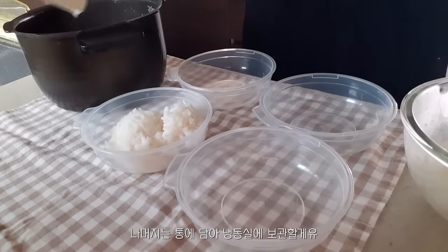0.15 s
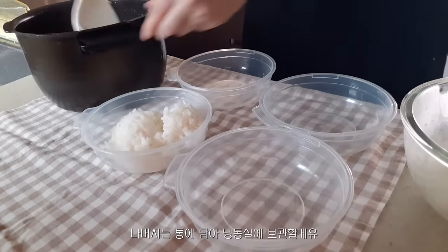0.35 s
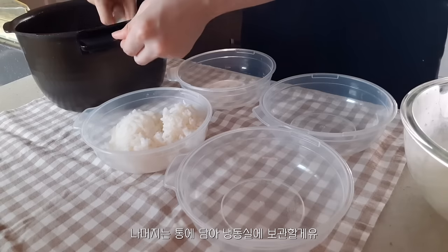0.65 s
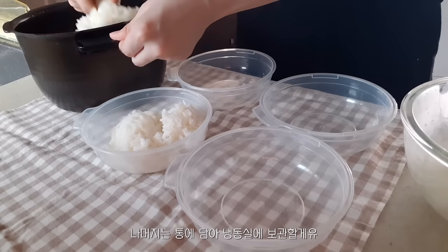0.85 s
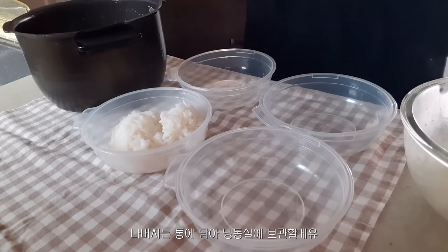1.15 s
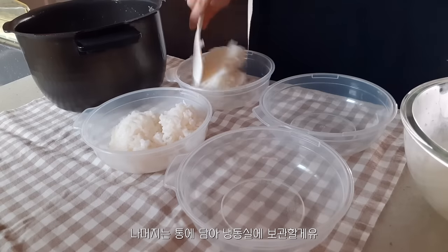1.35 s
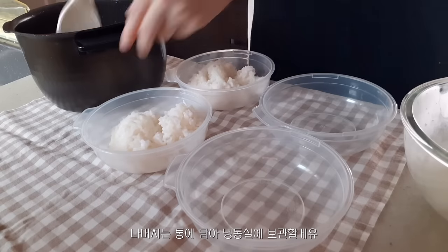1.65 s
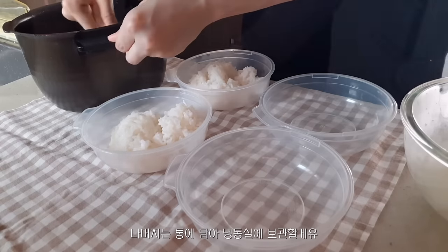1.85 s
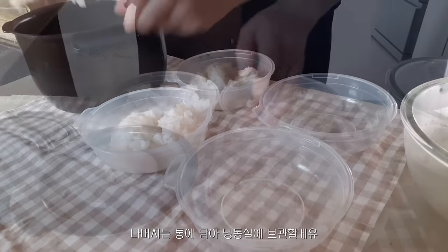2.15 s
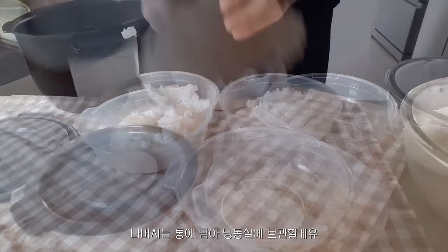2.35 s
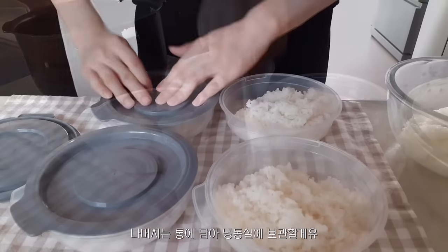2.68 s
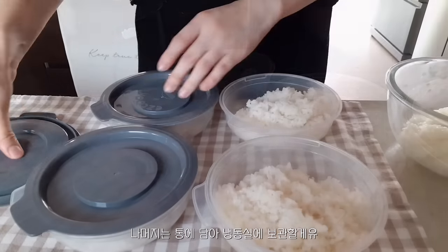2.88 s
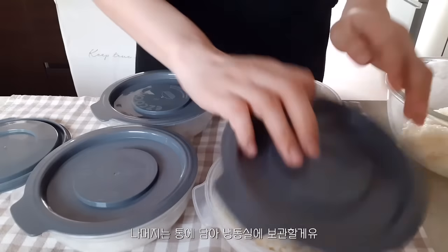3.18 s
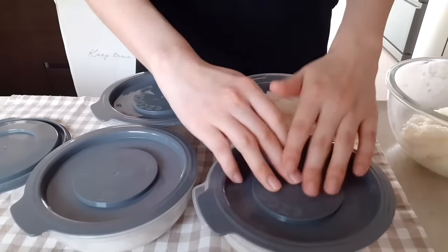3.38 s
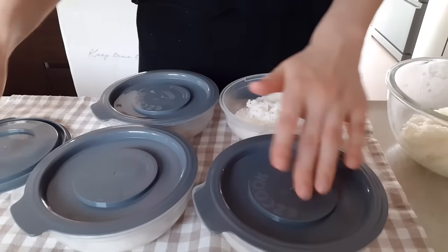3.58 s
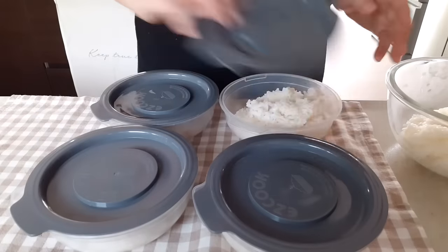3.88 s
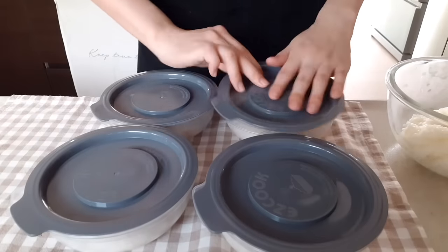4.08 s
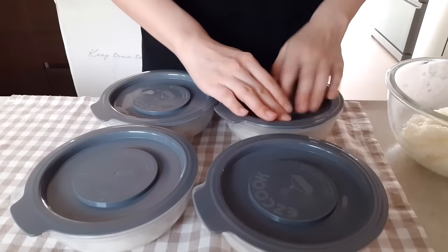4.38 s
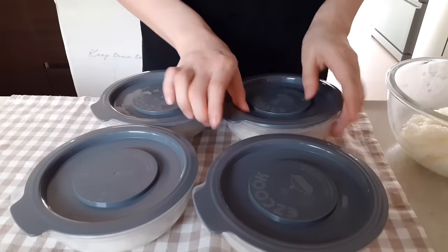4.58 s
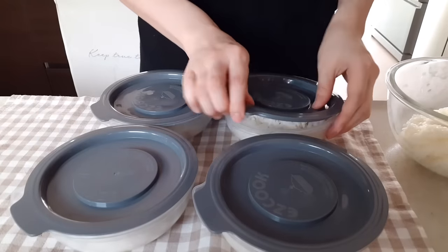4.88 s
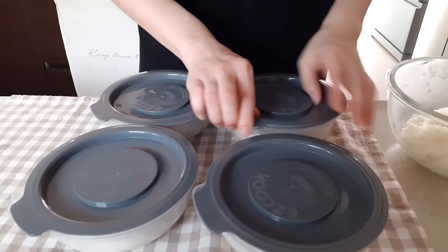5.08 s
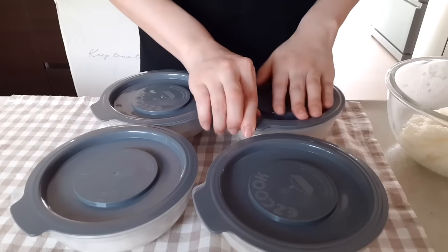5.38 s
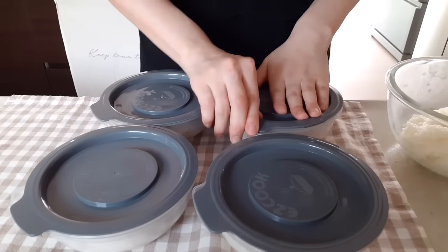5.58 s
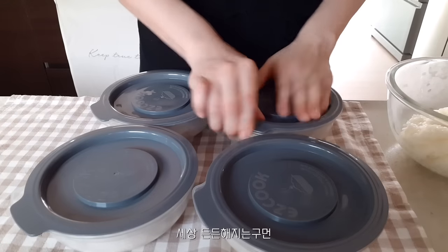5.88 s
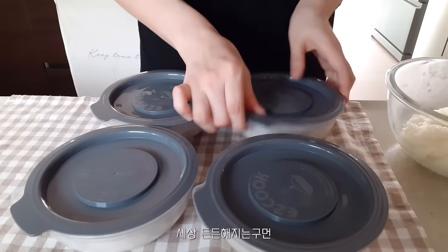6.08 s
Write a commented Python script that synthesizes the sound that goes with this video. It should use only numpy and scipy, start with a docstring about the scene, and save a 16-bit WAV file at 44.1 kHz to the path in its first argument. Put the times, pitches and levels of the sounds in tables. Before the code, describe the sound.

Plastic food tubs are closed at close range in a quiet kitchen, with a short echo, faint low room noise and a slight high hiss early on. Near 0.9 seconds a paddle lightly grazes a pot, followed by a soft thud of rice. Another muffled pat and a quick cluster of hollow knocks come around 1.8 seconds. From 2 to 2.9 seconds lids and rims click, scrape and clatter, with a sharp clack at 2.6. Between 3 and 3.5 seconds lids snap on with loud hollow pops. Tiny squeaks, scrapes and a run of lighter knocks follow until about 4.2 seconds. Then palms softly rub and pat a lid, with dull thumps around 5 seconds and a heavier push at 5.6. One more snap sounds near 5.9 seconds, and faint ticks and a soft pat close at about 6.1.

```python
"""Packing rice into plastic tubs

Rice is scooped from a pot into thin tubs on a cloth-covered kitchen table; lids are laid on and
pressed shut. Each knock is a short contact that rings tub, lid and room: more weight gives more thud
and less ring. Rims scrape and squeak, lid panels pop, palms rub and press, over faint hiss and air."""
import sys
import numpy as np
from scipy import signal
from scipy.fft import rfft, irfft, next_fast_len
from scipy.io import wavfile
from scipy.ndimage import uniform_filter1d

SR = 44100
rng = np.random.default_rng(int(sys.argv[2]) if len(sys.argv) > 2 else 0)


def output_pcm(signal):
    """Save a mono or channel-first signal as 16-bit PCM at the path in sys.argv[1].

    Samples are clipped to [-1, 1] before scaling.
    """
    pcm = np.clip(np.atleast_2d(signal).T, -1, 1) * 32767
    wavfile.write(sys.argv[1], SR, np.round(pcm).astype(np.int16))


N = 274743
RING_SAMPLES = 11025


def amp(db):
    return 10 ** (np.asarray(db) / 20)


def unit_rms(x):
    return x / np.sqrt(np.mean(x ** 2) + 1e-20)


def unit_energy(x):
    return x / np.sqrt(np.sum(x ** 2) / len(x))


def over_time(points):
    return np.interp(np.arange(N) / SR, *np.transpose(points))


def over_log_hz(points, hz):
    f, value = np.transpose(points)
    return np.interp(np.log(hz + 1), np.log(f + 1), value)


def resonance(f, hz, q):
    return 1 / (1 + (q * ((f + 1) / hz - hz / (f + 1))) ** 2)


def add(mix, start_s, sound):
    part = mix[:, max(round(start_s * SR), 0):][:, :sound.shape[-1]]
    part += sound[..., :part.shape[1]]


def pulse(gain, size=2048):
    """Minimum-phase pulse with spectrum gain(f)."""
    log_gain = np.log(gain(abs(np.fft.fftfreq(size, 1 / SR))) + 1e-5)
    return np.fft.ifft(np.exp(np.conj(signal.hilbert(log_gain)))).real


# Hard knocks and snaps on a rim: (time [s], strength [dB], hand weight [dB], ring [Hz])
RIM_KNOCKS = [(1.8095, -1, -2.5, 3080), (1.8146, 4, 5.5, 1350), (1.8187, -0.5, 9.5, 3150),
              (2.052, -8.5, -3.5, 3770), (2.077, -9.5, -2, 3700), (2.4435, 2, -9, 2800),
              (2.513, -5, -12.5, 2640), (2.527, 0.5, -3.5, 3660), (2.6091, 12.5, -2, 1670),
              (3.011, -0.5, -1, 1260), (3.2175, 3.5, -1, 1940), (3.3365, 5, 0, 2080), (3.341, -4, -9, 2430),
              (3.348, -1, -2.5, 2260), (3.461, 10, 7.5, 1790), (3.969, -2.5, 6.5, 3940),
              (4.028, -6.5, -16, 2410), (4.051, -5, 5, 2400), (4.083, -13, -11, 2520),
              (4.129, -7, -7.5, 2550), (4.19, -9, -6, 2240), (4.194, -4, 5, 2096), (5.863, -3, 1, 2190)]
HARD = dict(clack_db=-2, crack_db=-9, ping_db=5.5, low_hz=74, high_hz=21993)
# Blows muffled by rice or a palm: (time [s], strength [dB], hand weight [dB], ring [Hz])
MUFFLED_PATS = [(0.95, -14.5, 10.5, 500), (1.732, -6, 4, 537), (3.625, -3, 1.5, 730),
                (4.9875, 2, -4.5, 1155), (5.05, -9, -1.5, 1130), (5.167, -10.5, -8.5, 1030),
                (5.388, -9.5, -6, 1280), (5.494, -3.5, 0.5, 1040), (5.611, 2, -1.5, 720),
                (6.142, -8, 1, 1550)]
SOFT = dict(clack_db=-19, crack_db=-25, ping_db=-27, low_hz=102, high_hz=4512)


def knocks(rows, touch, choke=0.34):
    """Short, chattering contacts; a heavy hand stays on the lid and chokes what follows."""
    out = np.zeros((2, N))
    for time_s, strength_db, weight_db, ring_hz in rows:
        offset_s, chatter = contact()
        force = signal.fftconvolve(chatter, blow(strength_db, weight_db, ring_hz, **touch))
        add(out, time_s + offset_s, radiate(force, scatter_db=-choke * max(weight_db, 0)))
    return out


def contact(scrape_db=-15, scrape_s=0.0007, settle_db=-7, settle_s=0.003):
    """A rim scrapes in, snaps home at t = 0 and chatters as it settles."""
    t = np.arange(-256, 2048) / SR
    scrape = slips(len(t), per_s=8300) * np.exp(-abs(t) / scrape_s) * (t < 0)
    settle = slips(len(t), per_s=1500) * np.exp(-abs(t) / settle_s) * (t > 0)
    chatter = amp(scrape_db) * unit_rms(scrape) + amp(settle_db) * unit_rms(settle)
    return t[0], (t == 0) + chatter / np.sqrt(len(t))


def blow(strength_db, weight_db, ring_hz, clack_db, crack_db, ping_db, low_hz, high_hz):
    """One blow drives tub, wall, rim and lid; weight feeds the thud and damps the ring."""
    stiffness_db = 7.5 * np.log2(ring_hz / 2500)  # a stiffer spot rings higher, cracks harder
    ring_q = 0.73 * 2 ** (-weight_db / 13)
    parts = [(weight_db, 270, 0.31),  # hollow tub: thud
             (clack_db, 1400, 0.2),  # wall
             (crack_db + stiffness_db, 7500, 0.47),  # rim
             (-weight_db, ring_hz, ring_q)]  # lid

    def spectrum(f):
        power = sum((amp(db) * resonance(f, hz, q) ** 2) ** 2 for db, hz, q in parts)
        lid_mode = resonance(f, ring_hz, q=20) * resonance(f, ring_hz, q=0.2)
        power += amp(ping_db - weight_db / 2) ** 2 * lid_mode
        rolloff = 1 + (f / high_hz) ** 6 + (low_hz / (f + 1)) ** 4
        return np.sqrt(power / rolloff)

    return amp(strength_db) * pulse(spectrum)


# Modes of tub and lid: (frequency [Hz], gain [dB])
TUB_MODES = [(250, 1), (400, -8), (680, 2), (862, 5), (1192, -0.5), (1440, -3.5), (1570, -1.5), (1760, -5),
             (2040, -2.5), (2250, -8), (2490, -10), (3700, 3.5), (4850, 4)]


def tub(impulse_db=-4, t60_at_1khz_s=0.1):
    """Direct impulse plus modes; soft plastic dies fast, higher modes faster."""
    t = np.arange(RING_SAMPLES) / SR
    out = amp(impulse_db) * (t == 0)
    for hz, db in TUB_MODES:
        decay = amp(-60 * t / t60_at_1khz_s * np.sqrt(hz / 1000))
        gripped_hz = hz * (1 + 0.01 * rng.standard_normal())
        out += 2 * amp(db) * decay / decay.sum() * np.cos(2 * np.pi * gripped_hz * t)
    return out


def radiate(force, scatter_db=0, delay_at_1khz_s=0.00044):
    """Force to stereo sound via tub and echoes; bending waves carry treble faster than bass."""
    size = next_fast_len(len(force) + RING_SAMPLES)
    f = np.fft.rfftfreq(size, 1 / SR)
    bend_turns = 2 * delay_at_1khz_s * np.sqrt(f * 1000)
    right_lag_s = rng.normal(50e-6, 20e-6)
    delay = np.exp(-2j * np.pi * np.array([bend_turns, bend_turns + right_lag_s * f]))
    response = tub() + amp(scatter_db) * echoes()
    return irfft(rfft(force, size) * rfft(response, size) * delay, size)


# Lid panel pops: (time [s], level [dB], pitch [Hz])
LID_POPS = [(3.011, 4, 1213), (3.2175, 11, 2040), (3.3365, 18, 2120), (3.341, 11.5, 2250)]


def lid_pops(panel_q=8):
    """The flat panel pops through as the rim seats: a hollow clack."""
    out = np.zeros((2, N))
    for time_s, db, hz in LID_POPS:
        add(out, time_s, radiate(amp(db) * pulse(lambda f: resonance(f, hz, panel_q))))
    return out


# Light rim contacts: (time [s], strength [dB], ring [Hz])
RIM_TICKS = [(2.039, -18, 3720), (2.093, -20, 3900), (2.141, -17.5, 3950), (2.147, -8, 3220),
             (2.285, -9.5, 1200), (2.401, -18.5, 4040), (2.489, -7, 2720), (2.587, -12.5, 2820),
             (2.809, 0.5, 2240), (2.841, -6, 2000), (2.865, -18.5, 5960), (2.873, -4, 5070),
             (3.122, -6, 1850), (3.142, -9.5, 2000), (3.785, -6, 2000), (3.894, 0.5, 4230),
             (6.003, -24, 5000), (6.127, -19, 4300)]
LIGHT = dict(clack_db=-1, crack_db=-4.5, ping_db=2, low_hz=1048.5, high_hz=21987)


def rim_ticks(weight_db=-4):
    """Rim flicks past rim: one clean contact with little weight."""
    out = np.zeros((2, N))
    for time_s, strength_db, ring_hz in RIM_TICKS:
        force = blow(strength_db + weight_db, weight_db, ring_hz, **LIGHT)
        add(out, time_s, radiate(force, scatter_db=-2))
    return out


# Palms push a tub down: (time [s], level [dB])
PALM_PRESSES = [(4.193, -4), (4.988, -2.5), (5.611, 14), (5.862, 3.5)]


def palm_presses(table_hz=135, table_q=0.34):
    """The table answers a push with a soft, low thump."""
    out = np.zeros((2, N))
    thump = pulse(lambda f: resonance(f, table_hz, table_q) ** 2)
    for time_s, db in PALM_PRESSES:
        add(out, time_s, radiate(amp(db) * thump, scatter_db=3))
    return out


# Rim sliding over rim: (start [s], end [s], level [dB], centre [Hz])
RIM_SCRAPES = [(1.728, 1.737, -54.5, 3460), (2.251, 2.302, -51.5, 3800), (2.46, 2.514, -54, 3400),
               (2.807, 2.863, -46, 2220), (3.228, 3.33, -52, 2120), (3.39, 3.445, -57, 1600),
               (3.716, 3.79, -58.5, 5060), (3.775, 3.798, -40.5, 4400), (3.837, 3.88, -58, 7000),
               (3.974, 4.22, -58.5, 3100), (5.484, 5.516, -57.5, 4000), (5.606, 5.617, -50, 4500),
               (5.884, 6.099, -67.5, 2200), (6.132, 6.185, -58.5, 2050)]


def rim_scrapes(q=0.61):
    """A rim catches and lets go, each jerk ringing the plastic around one pitch."""
    out = np.zeros((2, N))
    for start_s, end_s, db, hz in RIM_SCRAPES:
        body = pulse(lambda f: np.sqrt(resonance(f, hz, 2 * q) * resonance(f, hz, q / 2)))
        add(out, start_s, stroke(end_s - start_s, db, body, slips_per_s=800, crackle_db=5.5))
    return out


def stroke(length_s, db, body, slips_per_s=1500, crackle_db=3.5):
    """Friction swells and fades, driving a body's impulse response."""
    size = max(round(length_s * SR), 64)
    friction = slips(size, slips_per_s, crackle_db) * signal.windows.tukey(size, 0.5)
    force = signal.fftconvolve(friction, body)
    return radiate(amp(db) * force * np.sqrt(size / (np.sum(force ** 2) + 1e-20)))


def slips(size, per_s, spread_db=4):
    """Sparse, tiny jerks of uneven size and either sign."""
    heights = amp(spread_db * np.minimum(rng.exponential(1, size), 4))
    return (rng.random(size) < per_s / SR) * heights * rng.choice([-1, 1], size)


# Palm over a lid, and first a rim dragging dully just before it snaps home at 3.461 s: (start [s], end [s],
# level [dB])
PALM_RUBS = [(3.443, 3.464, -48), (3.587, 3.64, -51), (4.31, 4.429, -64.5), (4.695, 4.775, -62),
             (4.987, 5.147, -59), (5.247, 5.272, -58.5), (5.399, 5.5, -61.5), (5.477, 5.506, -44),
             (5.618, 5.679, -58.5), (5.999, 6.006, -48)]
# Skin on plastic: (centre [Hz], Q, gain [dB])
SKIN_BANDS = [(1200, 0.73, 3), (4300, 0.84, -16)]


def palm_rubs():
    """Sliding skin, or a dragging rim, crackles through broad resonances: dull, with a soft hiss."""
    out = np.zeros((2, N))
    body = pulse(lambda f: sum(amp(db) * resonance(f, hz, q) ** 2 for hz, q, db in SKIN_BANDS))
    for start_s, end_s, db in PALM_RUBS:
        add(out, start_s, stroke(end_s - start_s, db, body))
    return out


# Plastic squeaks: (start [s], end [s], first pitch [Hz], last pitch [Hz], level [dB])
PLASTIC_SQUEAKS = [(2.979, 2.992, 13900, 15800, -37.5), (2.996, 2.999, 13300, 14300, -24.5),
                   (3.747, 3.771, 10240, 15200, -33.5), (3.972, 3.995, 835, 945, -38.5),
                   (4.008, 4.025, 884, 970, -44.5), (5.86, 5.868, 14350, 12500, -38)]


def squeaks(waver=0.061, roughness=0.87):
    """Fast stick-slip gives a short, unsteady gliding tone."""
    out = np.zeros((2, N))
    for start_s, end_s, first_hz, last_hz, db in PLASTIC_SQUEAKS:
        size = max(round((end_s - start_s) * SR), 64)
        drift, grip = unit_rms(uniform_filter1d(rng.standard_normal((2, size)), size=24, axis=1))
        pitch_hz = np.linspace(first_hz, last_hz, size) * (1 + waver * drift)
        envelope = np.exp(roughness * grip) * signal.windows.tukey(size, 0.3)
        tone = np.sin(2 * np.pi * np.cumsum(pitch_hz) / SR) * envelope
        tone = signal.lfilter(*signal.butter(2, first_hz / 2, "highpass", fs=SR), tone)
        add(out, start_s, radiate(amp(db) * unit_rms(tone), scatter_db=-3))
    return out


def pot_graze(start_s=0.877, end_s=0.897, db=-57, scrape_db=28, ring_db=10, ring_hz=3400, t60_s=0.025):
    """The paddle scrapes the pot and faintly rings it."""
    out = np.zeros((2, N))
    t = np.arange(RING_SAMPLES) / SR
    ring = amp(ring_db - 60 * t / t60_s) * np.sin(2 * np.pi * ring_hz * t)
    add(out, start_s, stroke(end_s - start_s, db, ring + amp(scrape_db) * (t == 0)))
    return out


def thin_ringing(start_s=1.47, end_s=1.676, db=-74, tones_hz=(3655, 4258, 8516, 9100)):
    """Faint, high tones swell and fade together."""
    out = np.zeros((2, N))
    t = np.arange(0, end_s - start_s, 1 / SR)
    tones = sum(np.sin(2 * np.pi * hz * t) for hz in tones_hz)
    add(out, start_s, amp(db) * tones * np.hanning(len(t)))
    return out


def echoes(flutter_db=-5, flutter_t60_s=0.023, room_db=-5.5, dull_db=-20, dull_hz=6000):
    """Flutter among the tubs, the kitchen's tail and a shorter, duller tail."""
    t = np.arange(RING_SAMPLES) / SR
    flutter = unit_energy(diffuse_noise(RING_SAMPLES) * amp(-60 * t / flutter_t60_s))
    dull = signal.lfilter(*signal.butter(2, dull_hz, fs=SR), kitchen(t60_scale=0.28))
    room = kitchen(t60_scale=0.69)
    return amp(flutter_db) * flutter + amp(room_db) * room + amp(dull_db) * dull


# Kitchen decay: (frequency [Hz], unscaled T60 [s])
KITCHEN_DECAY = [(200, 0.34), (1000, 0.26), (3500, 0.26), (15000, 0.18)]


def kitchen(t60_scale, build_s=0.00022):
    """Wall echoes build up, then each band dies at its own rate."""
    hz, frame_s, bands = signal.stft(diffuse_noise(RING_SAMPLES), SR, nperseg=256)
    t60_s = t60_scale * over_log_hz(KITCHEN_DECAY, hz)[:, None]
    tail = signal.istft(bands * amp(-60 * frame_s / t60_s), SR)[1][:, :RING_SAMPLES]
    onset = 1 - np.exp(-(np.arange(RING_SAMPLES) / SR / build_s) ** 2)
    return unit_energy(tail * onset)


# Left-right likeness of scattered sound: (frequency [Hz], coherence [0-1])
COHERENCE = [(200, 0.93), (600, 0.83), (1500, 0.1), (4000, 0)]


def diffuse_noise(size):
    """Stereo white noise, alike in the bass and apart in the treble."""
    mid, side = rfft(rng.standard_normal((2, size)))
    coherence = over_log_hz(COHERENCE, np.fft.rfftfreq(size, 1 / SR))
    mid *= np.sqrt((1 + coherence) / 2)
    side *= np.sqrt((1 - coherence) / 2)
    return irfft(np.array([mid + side, mid - side]), size)


def drifting_noise(spectrum, flicker_db=2):
    """Coloured noise whose level drifts in patches of time and frequency."""
    hz, _, bands = signal.stft(diffuse_noise(N), SR, nperseg=2048)
    patches = uniform_filter1d(rng.standard_normal(bands.shape[1:]), size=10, axis=0)
    patches = unit_rms(uniform_filter1d(patches, size=6, axis=1))
    gain = amp(over_log_hz(spectrum, hz)[:, None] + flicker_db * patches)
    return unit_rms(signal.istft(bands * gain, SR)[1][:, :N])


# Hiss colour: (frequency [Hz], relative density [dB])
HISS_SPECTRUM = [(1500, -26.5), (4200, -6), (5500, -4), (6200, 5), (7000, -13), (15000, -27)]
# Hiss envelope: (time [s], level [dB])
HISS_ENVELOPE = [(1.35, -74), (1.8, -77.5), (2.7, -82)]
MIDDLE_START_S, MIDDLE_END_S = 0.63, 4.29


def hiss(flutter_db=2.2):
    """A soft, high hiss flutters while the rice is scooped, then recedes."""
    t = np.arange(N) / SR
    flutter = unit_rms(uniform_filter1d(rng.standard_normal(N), size=1500))
    gate = (t > MIDDLE_START_S) * (t < MIDDLE_END_S)
    return drifting_noise(HISS_SPECTRUM) * amp(over_time(HISS_ENVELOPE) + flutter_db * flutter) * gate


# Room noise colours: (frequency [Hz], relative density [dB])
EARLY_AIR = [(25, -4), (105, -3), (300, -18.5), (520, -33), (1300, -32), (1550, -23.5), (1900, -34),
             (4200, -37.5), (9000, -54.5), (13000, -47)]
MIDDLE_AIR = [(40, -46.5), (130, -18.5), (210, -5), (290, -10), (400, -3.5), (480, -15), (700, -11),
              (900, -21), (1220, -18), (1700, -31.5), (8000, -38), (15000, -40)]
LATE_AIR = [(25, -15.5), (110, -1.5), (220, -12), (450, -20.5), (1000, -18.5), (2000, -28), (3200, -34),
            (6000, -38.5), (9000, -50.5), (13000, -35.5)]
# Room noise envelope: (time [s], level [dB])
AIR_ENVELOPE = [(.63, -56), (.75, -60.5), (2.8, -54.5), (3.15, -62), (4.3, -60), (4.65, -63), (6.2, -57)]


def room_air():
    """Faint, low room noise; its colour switches abruptly twice."""
    t = np.arange(N) / SR
    early, middle, late = map(drifting_noise, (EARLY_AIR, MIDDLE_AIR, LATE_AIR))
    air = np.select([t < MIDDLE_START_S, t < MIDDLE_END_S], [early, middle], late)
    return air * amp(over_time(AIR_ENVELOPE))


# Foreground pan: (time [s], left minus right [dB])
PAN = [(2, -3.5), (3.12, -2), (3.21, 1), (3.902, -0.5), (5, 0.5)]


def scene():
    """Knocks, thuds, friction and faint high tones, panned together, over the background."""
    blows = knocks(RIM_KNOCKS, HARD) + lid_pops() + rim_ticks()
    thuds = knocks(MUFFLED_PATS, SOFT) + palm_presses()
    friction = rim_scrapes() + palm_rubs() + squeaks() + pot_graze()
    foreground = blows + thuds + friction + thin_ringing()
    pan_db = over_time(PAN)
    return foreground * amp([pan_db / 2, -pan_db / 2]) + room_air() + hiss()


def record(dry):
    """Steep low-pass at 16.2 kHz."""
    lowpass = signal.firwin(511, 16200, window=("kaiser", 9), fs=SR)
    return signal.oaconvolve(dry, lowpass[None], "same")


dry = scene()
out = record(dry)
output_pcm(out)
```